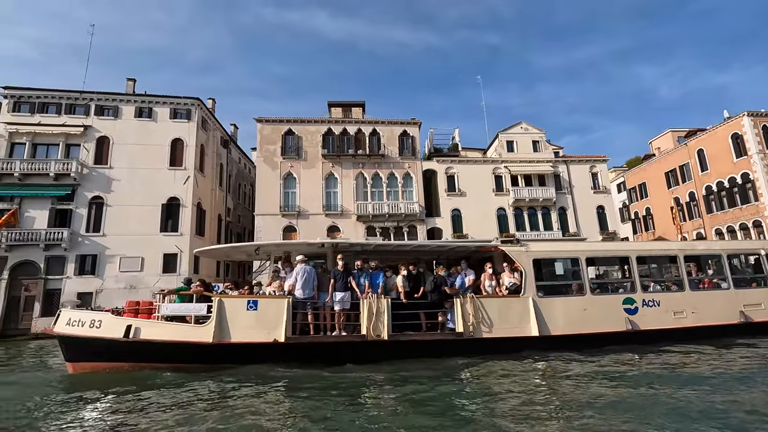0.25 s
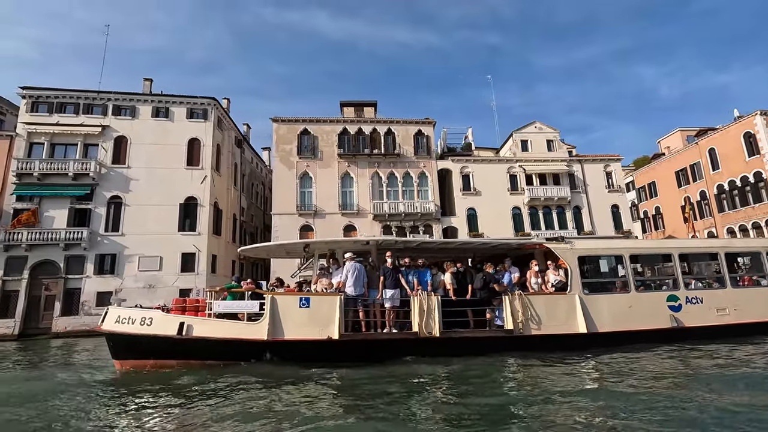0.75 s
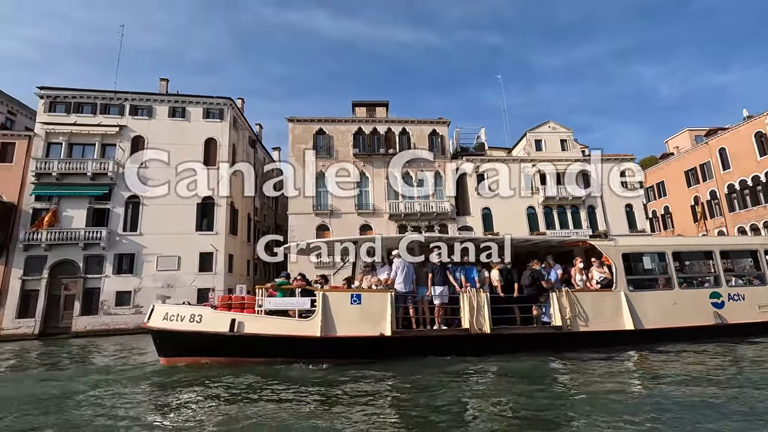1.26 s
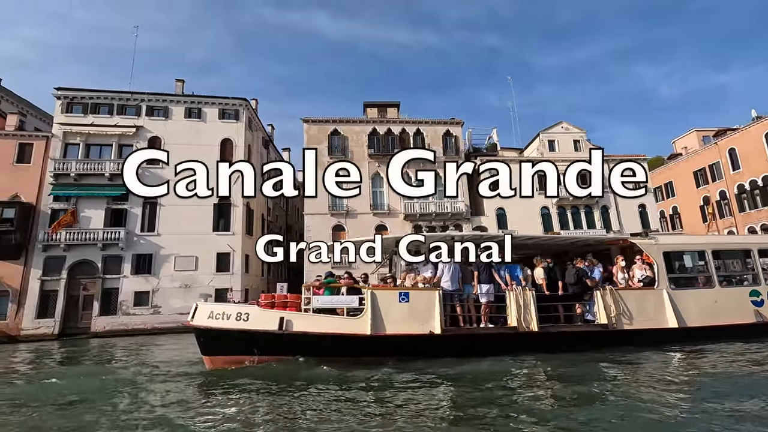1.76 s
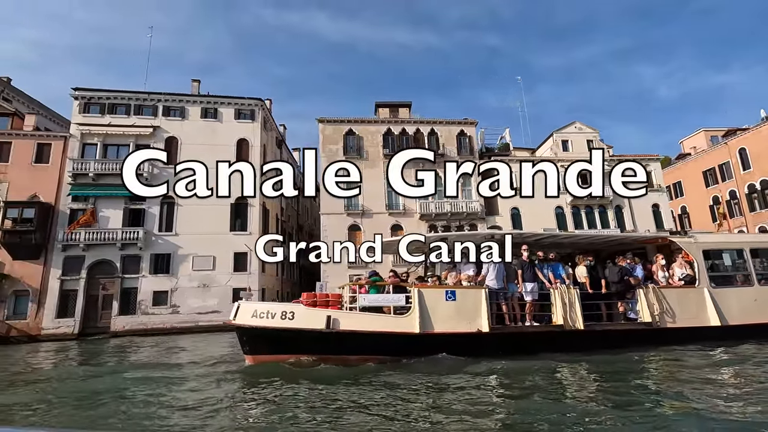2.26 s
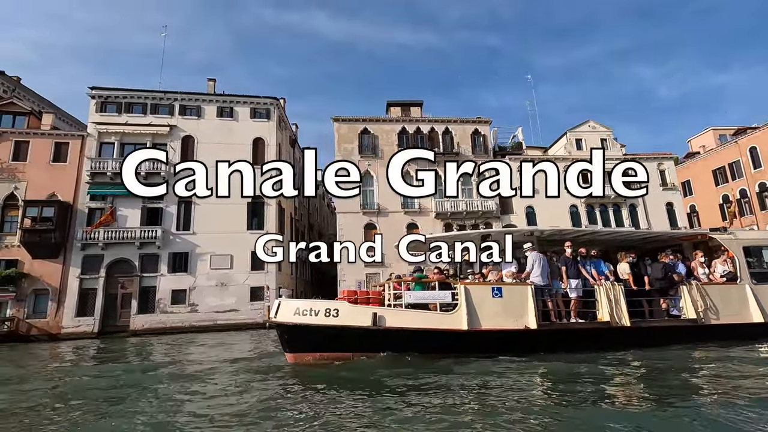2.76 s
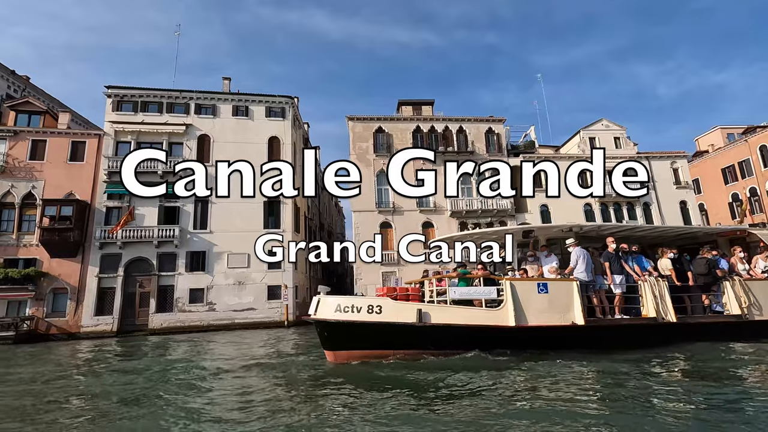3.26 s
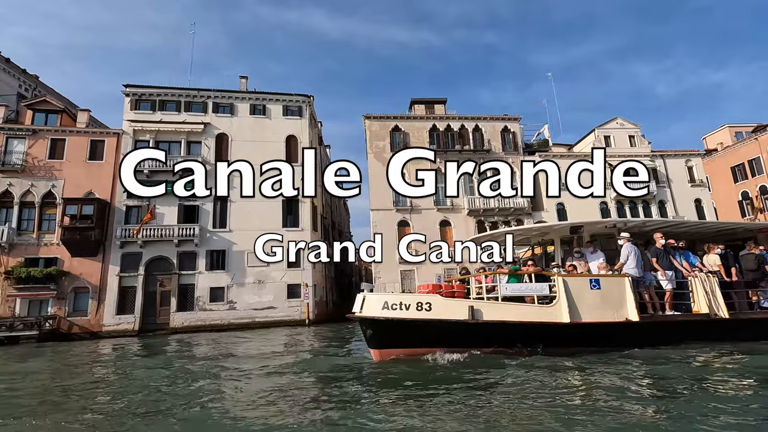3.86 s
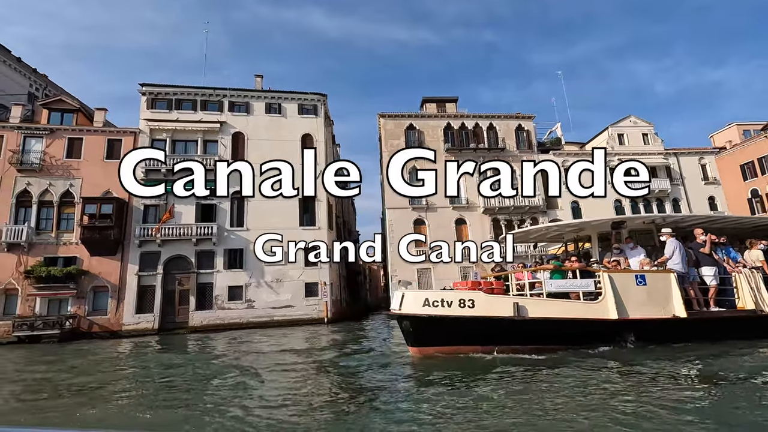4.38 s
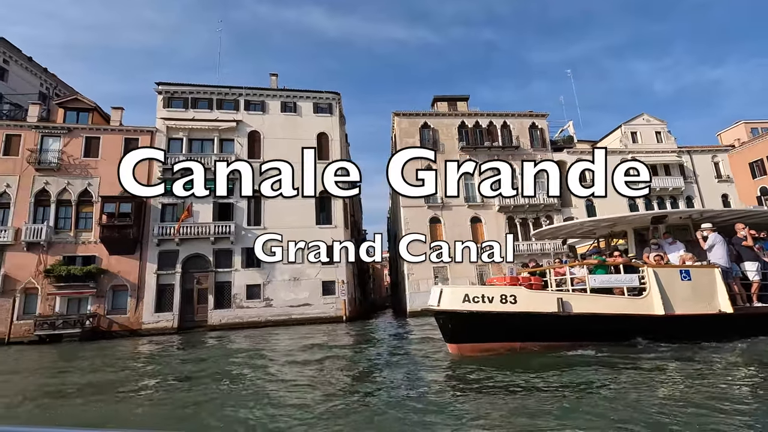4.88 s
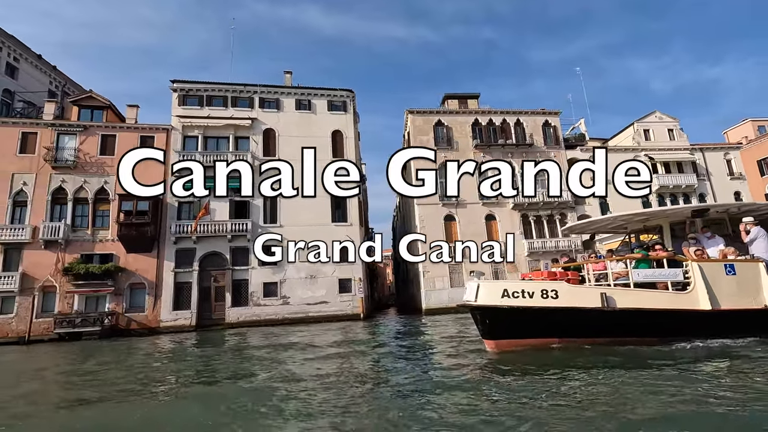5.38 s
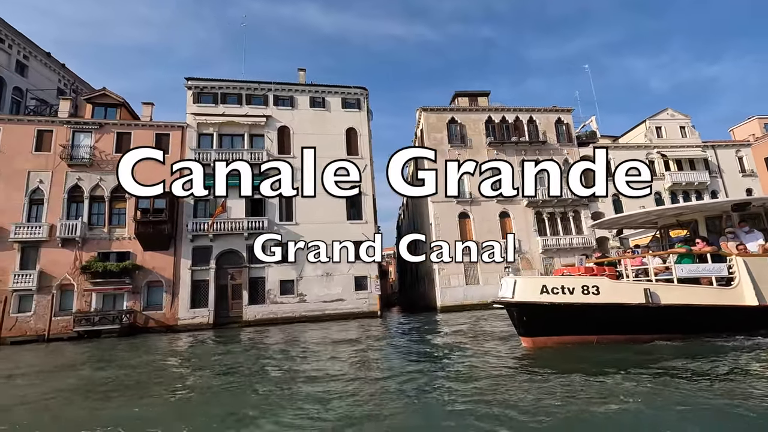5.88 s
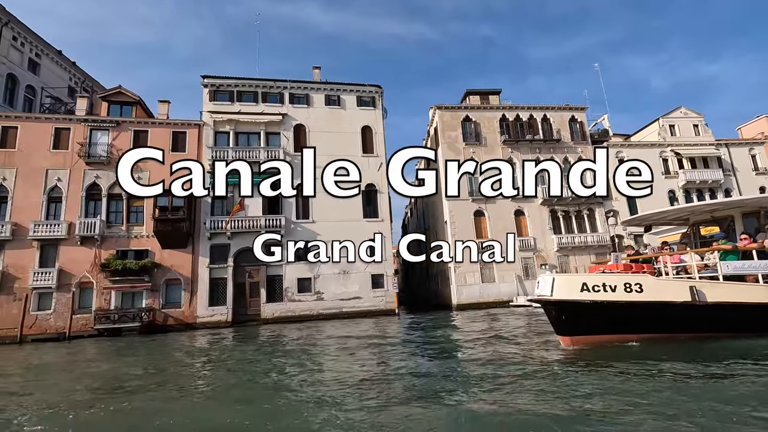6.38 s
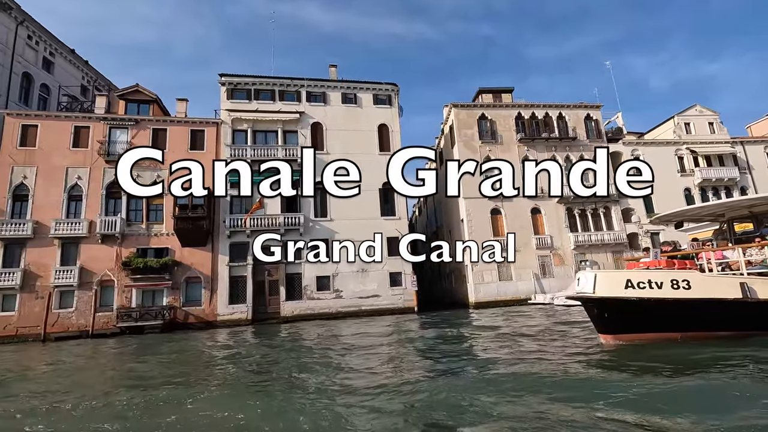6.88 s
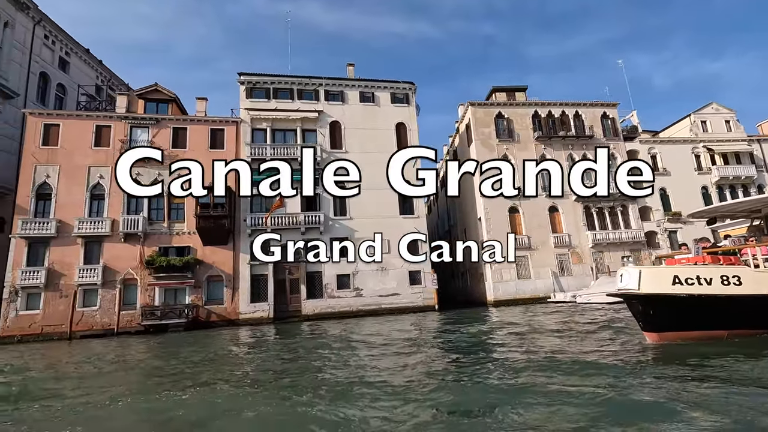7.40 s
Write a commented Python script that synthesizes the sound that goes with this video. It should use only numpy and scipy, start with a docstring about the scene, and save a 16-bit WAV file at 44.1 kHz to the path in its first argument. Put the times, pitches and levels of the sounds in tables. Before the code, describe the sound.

A small motorboat's low engine hum throbs steadily against a passing ferry's engine, while water rushes, gurgles and lightly slaps along the hull.

```python
"""The engine of a small motorboat hums along a canal, throbbing against that of a passing passenger ferry.
Wavering tones on the crankshaft rate make the hum, a singing cabin panel, a drive whine and the propeller's chug.
Shaped noise gives exhaust burble and rushing water; resonators fed with clicks make it gurgle and tinkle.
Short noise bursts slap the hull and drip, rising sines are single bubbles, and bow waves swell the hiss and foam."""
import sys
import numpy as np
from scipy import signal
from scipy.fft import rfft, irfft, next_fast_len
from scipy.io import wavfile

SR = 44100
rng = np.random.default_rng(int(sys.argv[2]) if len(sys.argv) > 2 else 0)


def unload_audio(sound):
    """Save the sound as a 16-bit wav file, at the path given as the first command line argument."""
    columns = np.transpose(np.atleast_2d(sound))
    # keep every value between -1 and 1, then stretch to whole-number steps
    steps = np.round(np.clip(columns, -1, 1) * 32767)
    wavfile.write(sys.argv[1], SR, steps.astype(np.int16))


N = 336924
TIME = np.arange(N) / SR  # seconds

# own engine's speed: (time [s], crankshaft rate [turns/s])
ENGINE_SPEED = [(0.0, 29.7), (0.95, 29.91), (1.2, 30.02), (1.5, 30.14), (1.9, 29.79), (2.33, 29.53),
                (2.68, 29.89), (3.05, 29.74), (3.45, 29.87), (3.8, 29.84), (4.4, 29.95), (4.95, 29.72),
                (5.6, 29.75), (6.05, 30.0), (6.45, 29.7), (6.9, 29.91), (7.3, 29.84), (7.64, 29.85)]
# own engine's hum: (multiple of crankshaft rate [ratio], level [dB], unsteadiness [share of level])
ENGINE_HUM = [(1, -40.3, .1), (1.5, -61, .3), (2, -36.2, .03), (2.5, -62, .3), (3, -51, .45),
              (3.5, -57, .4), (4, -52.5, .35), (5, -58.5, .4), (9, -62, .6), (11, -61, .5), (20, -66.5, .5)]
# cabin panel singing at ten times the crankshaft rate: (time [s], level before the throb [dB])
PANEL_LEVEL = [(0.0, -48), (0.15, -46.5), (0.48, -52), (0.63, -48), (0.86, -57), (1.0, -51), (1.28, -59),
               (1.55, -51), (1.8, -58), (1.93, -47.5), (2.4, -48), (2.72, -45.5), (3.03, -53.5),
               (3.55, -46.5), (4.0, -50.5), (4.72, -48), (4.81, -58), (4.92, -50), (5.2, -46.5),
               (5.35, -52), (6.05, -46.5), (6.3, -48.5), (6.6, -45.7), (7.64, -47)]
PANEL_THROB = .25  # share by which the panel trembles with the beat of the two engines
# drive whine: (time [s], level [dB])
WHINE_LEVEL = [(0.0, -61), (0.9, -62), (2.1, -53), (3.3, -59), (4.0, -56), (5.1, -53), (5.8, -54.5),
               (6.3, -80), (6.8, -58), (7.64, -51.5)]
WHINE_ORDER = 7.41  # multiple of the crankshaft rate
# own propeller's chug, swelling with its load: (time [s], level [dB])
PROPELLER_LEVEL = [(0, -41), (0.7, -56), (1.4, -44), (2.0, -45), (3.3, -54), (4.3, -39.5), (4.8, -50),
                   (5.3, -41.5), (5.75, -53), (6.3, -43), (7.64, -46)]
BLADE_ORDER, BLADE_OCTAVE_DB = 1.67, -52.5  # multiple of the crankshaft rate; level of the octave above
# the ferry's engine, throttled back as it draws level: (time [s], firing rate [Hz], level [dB])
FERRY_ENGINE = [(0.0, 64.22, -44), (0.2, 62.69, -42), (0.5, 63.63, -36), (0.9, 64.44, -37),
                (1.15, 62.8, -41), (1.45, 65.82, -40.5), (1.8, 65.39, -48), (2.2, 67.37, -45),
                (2.5, 65.79, -36.5), (2.9, 67.07, -37.5), (3.4, 66.37, -40.5), (3.9, 66.93, -40.5),
                (4.5, 66.94, -39.5), (4.95, 66.48, -43), (5.15, 64.4, -42), (5.35, 61.4, -41),
                (5.65, 61.15, -31), (6.0, 60.93, -36), (6.5, 60.13, -49), (6.85, 60.84, -40),
                (7.15, 60.83, -38.5), (7.64, 60.64, -45)]
# overtones of the ferry's exhaust: (multiple of firing rate [ratio], level [dB], unsteadiness [share of level])
FERRY_OVERTONES = [(1.5, -55, .6), (2, -59, .6), (2.5, -59, .6), (4, -63, .5)]
# exhaust burble: (time [s], level [dB])
BURBLE_LEVEL = [(0, -39.5), (2.9, -40.5), (3.8, -40), (6.3, -40.5), (6.85, -39), (7.64, -40.5)]

# water rushing along the hull, before the waves add to it: (time [s], level [dB])
RUSH_LEVEL = [(0, -48.5), (1.5, -48.5), (3.3, -48), (4.3, -48.5), (5.3, -48), (5.8, -48), (6.5, -50),
              (6.9, -48), (7.64, -49.6)]
# hull resonances that colour the wash: (pitch [Hz], relative level [dB], time to fall by 60 dB [s])
HULL_MODES = [(488, -0.5, 0.11), (586, -6.5, 0.027), (933, -0.5, 0.17), (1183, 3.5, 0.023),
              (1400, -1.5, 0.085), (1638, -6.5, 0.14)]
# waves breaking at the bow: (time [s], spray level [dB], foam level [dB], decay time constant [s])
BOW_WAVES = [(0.58, -59, -96, 0.17), (1.01, -59, -74, 0.24), (1.77, -58, -73, 1), (2.421, -61, -79, 0.91),
             (2.80, -66, -82, 0.99), (3.68, -61, -73, 0.24), (3.99, -57, -77, 0.14), (4.62, -65, -84, 1),
             (5.0, -64, -82, 0.5), (5.62, -62.5, -90, 0.47), (6.72, -61, -84, 0.51),
             (7.07, -61.5, -79, 0.37)]
WAVE_RISE_S, WAVE_CHURN_DB = 0.069, 3.5  # build-up of every wave; its churn in the wash, above its spray
SPRAY_DB, FOAM_DB, SPRAY_WAVER_DB = -60, -79, 0.6  # steady hiss and foam; how far all the hiss wavers
# wavelets slapping the hull: (time [s], peak level [dB], pitch of trapped air [Hz], pitch spread [octaves])
HULL_SLAPS = [(1.651, -42, 970, 0.3), (3.238, -37, 1110, 0.49), (3.32, -41, 1060, 0.35),
              (3.382, -41, 520, 0.83), (4.045, -47, 1290, 0.42), (5.24, -41, 1050, 0.5),
              (6.826, -37, 1020, 0.48), (6.868, -43, 1120, .3)]
# single bubbles that plink or glug: (time [s], peak level [dB], starting pitch [Hz])
SINGLE_BUBBLES = [(3.131, -47, 2980), (3.131, -47, 2480), (3.240, -40, 956), (3.241, -43, 1216),
                  (3.509, -40, 1055), (3.519, -46, 1210), (4.775, -45, 900), (5.14, -48, 975),
                  (5.745, -47, 416), (5.838, -43, 465), (5.85, -44, 317), (5.925, -50, 507),
                  (5.965, -46, 354), (6.738, -47, 955), (6.756, -49, 995), (6.78, -45, 425),
                  (7.004, -45, 408)]
BUBBLE_CYCLES, BUBBLE_RISE = 5.1, 0.0047  # cycles until loudest; rise in pitch per cycle, as a share
# drops landing: (time [s], peak level before panning [dB], pitch [Hz], pitch spread [octaves])
WATER_DROPS = [(1.37, -71.5, 9500, .4), (2.476, -61, 7500, .4), (2.657, -63, 9000, .4),
               (2.731, -58, 10000, .5), (2.881, -52, 7550, .4), (2.918, -59, 9500, .3),
               (3.745, -59, 9500, .5), (3.8, -61, 10500, 0.44), (3.826, -59, 10400, .5),
               (4.344, -63, 8000, .6), (4.833, -62, 7000, 0.37)]

# colour of the exhaust burble: (frequency [Hz], relative density [dB per Hz])
RUMBLE_SPECTRUM = [(14, -21), (24, -9.5), (37, -8.5), (50, -3.5), (62, -2.5), (77, -5.5), (96, -1),
                   (112, -6), (140, -12), (158, -12.5), (175, -15.5), (250, -16.5), (340, -17.5),
                   (500, -38.5), (900, -67)]
# colour of the water rushing along the hull: (frequency [Hz], relative density [dB per Hz])
WASH_SPECTRUM = [(150, -35), (300, -16.5), (420, 1.5), (520, 1), (680, -2), (850, -4), (940, -0.5),
                 (1130, -6), (1400, -5.5), (1600, -11.5), (2200, -17), (4000, -39)]
# colour of the bow wave's hiss: (frequency [Hz], relative density [dB per Hz])
SPRAY_SPECTRUM = [(700, -20), (1600, 0), (2200, 1.5), (3000, 1.5), (4000, -3.5), (5500, -7.5), (7600, -15),
                  (8600, -22.5), (11000, -23), (14000, -46)]
# colour of the fizzing foam: (frequency [Hz], relative density [dB per Hz])
FIZZ_SPECTRUM = [(3000, -32), (6000, 4.5), (8000, 3.5), (9000, 0), (10500, 0), (11500, -1), (13000, 1.5),
                 (14200, -17)]
# stereo width of the shaped noises: (frequency [Hz], left-right likeness [0 to 1])
STEREO_LIKENESS = [(60, 1), (170, 1), (350, 0.98), (520, 0.98), (720, 0.91), (1400, 0.91), (2000, 0.74),
                   (3000, 0.74), (5600, 0.78), (8600, 0.48), (10500, 1), (12700, .1)]
# sound reaches the right microphone first: (frequency [Hz], phase lead of the left one [radians])
LEFT_LEAD = [(150, -.005), (420, -0.12), (700, -0.36), (1250, -0.47), (2000, -0.72), (3000, -0.89),
             (5000, -0.73), (7000, -0.28)]
CUTOFF_HZ = 14200


def from_db(db):
    """Decibels to gain."""
    return 10 ** (np.asarray(db) / 20)


def rms_one(x):
    """Scale to an rms of 1."""
    return x / np.sqrt(np.mean(x ** 2) + 1e-20)


def in_time(rows):
    """Each column of a curve at every sample."""
    s, *columns = np.transpose(rows)
    return [np.interp(TIME, s, column) for column in columns]


def at_hz(points, hz):
    """Read a curve on a log-frequency axis."""
    f, value = np.transpose(points)
    return np.interp(np.log(hz + 1e-3), np.log(f), value)


def pan(left_db):
    """Left and right gains for a level difference; positive leans left."""
    return from_db(np.array([[.5], [-.5]]) * left_db)


def drift(rate_hz):
    """Smoothed noise that wanders slowly, faster for a higher rate; spread 1."""
    step = 40  # samples between the points of the slow curve
    count = N // step + 2
    pole = np.exp(-2 * np.pi * rate_hz * step / SR)
    noise = rng.standard_normal(count + 2000)
    slow = signal.lfilter([1], [1, -2 * pole, pole ** 2], noise)[2000:]  # skip the filter's start
    return np.interp(np.arange(N) / step, np.arange(len(slow)), rms_one(slow))


def tone(turns, unsteady):
    """A sine of rms 1 that wavers slowly in strength and phase."""
    waver = 1 + unsteady * (drift(1.94) + 1j * drift(2.6)) / np.sqrt(2)
    return rms_one(np.real(waver * np.exp(2j * np.pi * turns)))


def coloured(pair, spectrum, patchy_db):
    """Two unrelated signals become stereo with this spectrum, each octave flickering on its own; rms 1."""
    size = next_fast_len(N)
    hz = np.arange(size // 2 + 1) * SR / size
    in_band = (hz > spectrum[0][0] / 2) & (hz < spectrum[-1][0] * 2)
    mid, side = rfft(pair, size) * from_db(at_hz(spectrum, hz)) * in_band
    alike = np.clip(at_hz(STEREO_LIKENESS, hz), 0, 1)
    both = np.sqrt(1 + alike) * mid + np.sqrt(1 - alike) * side * [[1], [-1]]
    octave = np.log2(hz + 1)
    out = 0
    for k in range(4, 15):
        share = np.maximum(1 - abs(octave - k), 0)  # overlapping triangular bands
        band = irfft(both * share, size)[:, :N]
        out = out + band * from_db(patchy_db * drift(11.0))
    return rms_one(out)


def grains(per_s, spread_db):
    """Clicks of either sign and uneven size at random moments, in two unrelated channels."""
    excess = np.minimum(rng.exponential(1, (2, N)), 4)
    sizes = from_db(spread_db * excess) * rng.choice([-1, 1], (2, N))
    return sizes * (rng.random((2, N)) < per_s / SR)


def ring(clicks, hz, t60):
    """A resonator: a unit click sets a sine of about height 1 ringing, down 60 dB after t60 seconds."""
    r = from_db(-60 / (t60 * SR))
    w = 2 * np.pi * hz / SR
    return signal.lfilter([0, np.sin(w)], [1, -2 * r * np.cos(w), r * r], clicks + 1e-18)


def bursts(rows, rise_s, decay_s):
    """Each row is a brief burst of noise, band-passed around its pitch and scaled to its peak level."""
    out = np.zeros(2 * N)
    t = TIME[:SR // 8]
    shape = (1 - np.exp(-t / rise_s)) * np.exp(-t / decay_s)
    for s, peak_db, hz, octaves in rows:
        edges = np.minimum(hz * 2 ** (np.array([-.5, .5]) * octaves), SR / 2 - 1)
        band = signal.butter(2, edges, "band", fs=SR, output="sos")
        burst = shape * signal.sosfilt(band, rng.standard_normal(len(t)))
        at = round(s * SR)
        out[at:at + len(t)] += from_db(peak_db) * burst / abs(burst).max()
    return out[:N]


def engine_hum(turns):
    """The boat's engine fires twice a turn; whole and fractional orders of the crankshaft rate add up."""
    hum = 0
    for order, level_db, unsteady in ENGINE_HUM:
        # the hull delays the orders on both sides of the firing rate, which smears the strokes into a drone
        smear = (order - 2) ** 2 / 4
        hum = hum + from_db(level_db) * tone(order * turns - smear, unsteady)
    return hum


def cabin_panel(turns, ferry_firings):
    """A panel sings on the engine's tenth order and trembles at the beat rate of the two engines."""
    beat = np.cos(2 * np.pi * (ferry_firings - 2 * turns))
    level = from_db(in_time(PANEL_LEVEL)[0])
    return level * (1 + PANEL_THROB * beat) * tone(10 * turns, unsteady=.07)


def drive_whine(turns):
    """The drive whines at a fixed multiple of the crankshaft rate."""
    return from_db(in_time(WHINE_LEVEL)[0]) * tone(WHINE_ORDER * turns, unsteady=0.16)


def propeller(turns):
    """The blades beat against the hull, unevenly in the churned water, with an octave above."""
    blades = BLADE_ORDER * turns
    beat = from_db(in_time(PROPELLER_LEVEL)[0]) * tone(blades, unsteady=.35)
    return beat + from_db(BLADE_OCTAVE_DB) * tone(2 * blades, unsteady=.6)


def ferry(firings):
    """Its firing tone lies a few Hz off the boat's own, so the two throb; its exhaust adds faint overtones."""
    out = from_db(in_time(FERRY_ENGINE)[1]) * tone(firings, unsteady=.04)
    for multiple, level_db, unsteady in FERRY_OVERTONES:
        out = out + from_db(level_db) * tone(multiple * firings, unsteady)
    return out


def exhaust_burble():
    """Exhaust burbling through the water: low noise whose octaves flicker."""
    noise = rng.standard_normal((2, N))
    return from_db(in_time(BURBLE_LEVEL)[0]) * coloured(noise, RUMBLE_SPECTRUM, patchy_db=1.36)


def water_rush(turns):
    """Water along the hull: shaped noise that swells slightly once and twice a crankshaft turn."""
    swell = 1 + 0.037 * np.cos(2 * np.pi * turns) + 0.014 * np.cos(2 * np.pi * 2 * turns)
    return swell * coloured(rng.standard_normal((2, N)), WASH_SPECTRUM, patchy_db=1.0)


def hull_ringing():
    """Churned water and engine clatter, as noise, ring the hull's resonances towards the left."""
    modes = 0
    for hz, level_db, t60 in HULL_MODES:
        modes = modes + from_db(level_db) * rms_one(ring(rng.standard_normal(N), hz, t60))
    return modes * pan(3.9) / np.sqrt(len(HULL_MODES))


def gurgle():
    """Small bubbles: random clicks are dealt among resonators, the higher ones dying away sooner."""
    clicks = grains(per_s=80, spread_db=2.5)[0]
    dealt = rng.integers(0, 28, N)
    pitches = np.geomspace(400, 1500, 28)
    return rms_one(sum(ring(clicks * (dealt == k), hz, 45 / hz) for k, hz in enumerate(pitches)))


def wash(turns, gain):
    """Rushing water, the ringing hull and gurgling bubbles rise and fall together."""
    mix = from_db(-0.06) * water_rush(turns) + from_db(-9.5) * hull_ringing() + from_db(-10.5) * gurgle()
    return gain * mix * pan(0.46)


def bow_waves():
    """Each wave builds quickly and dies away; gives the power of all their spray and of their foam."""
    spray_power, foam_power = 0, 0
    for s, spray_db, foam_db, decay_s in BOW_WAVES:
        age = np.maximum(TIME - s, 0)
        build = np.minimum(age / WAVE_RISE_S, 1)
        shape = build * np.exp(-np.maximum(age - WAVE_RISE_S, 0) / decay_s)
        spray_power = spray_power + (from_db(spray_db) * shape) ** 2
        foam_power = foam_power + (from_db(foam_db) * shape) ** 2
    return spray_power, foam_power


def tinkle():
    """Countless bursting bubbles: clicks ring high resonators."""
    clicks = grains(per_s=450, spread_db=3.5)[0]
    dealt = rng.integers(0, 40, N)
    pitches = np.geomspace(1700, 7500, 40)
    # smaller bubbles ring higher and more faintly
    return rms_one(sum(ring(clicks * (dealt == k), hz, 70 / hz) / hz for k, hz in enumerate(pitches)))


def spray(gain):
    """The bow wave hisses as noise with dense clicks pattering in it, and tinkles."""
    patter = rng.standard_normal((2, N)) + 0.83 * rms_one(grains(per_s=2500, spread_db=0.0))
    hiss = coloured(patter, SPRAY_SPECTRUM, patchy_db=1.0)
    return gain * (hiss + from_db(-6.5) * tinkle()) * pan(-0.8)


def foam(gain):
    """Foam fizzes towards the left: a very dense shower of clicks, kept to the treble."""
    return gain * coloured(grains(per_s=7000, spread_db=3.0), FIZZ_SPECTRUM, patchy_db=-0.5) * pan(3.8)


def hull_slaps():
    """Wavelets trap air against the hull in short, pitched bursts of noise."""
    return bursts(HULL_SLAPS, rise_s=0.0054, decay_s=0.0083)


def single_bubbles():
    """Each bubble swells and dies within a few dozen cycles, rising in pitch as it nears the surface."""
    out = np.zeros(2 * N)
    t = TIME[:SR // 4]
    for s, peak_db, hz in SINGLE_BUBBLES:
        cycles = hz * t
        age = cycles / BUBBLE_CYCLES
        swell = (age * np.exp(1 - age)) ** 2
        rising = np.sin(2 * np.pi * cycles * (1 + BUBBLE_RISE * cycles / 2))
        at = round(s * SR)
        out[at:at + len(t)] += from_db(peak_db) * swell * rising
    return out[:N]


def water_drops():
    """Drops land as very short, high bursts of noise, a little to the left."""
    return bursts(WATER_DROPS, rise_s=0.002, decay_s=0.003) * pan(2.5)


def scene():
    """Engines below, water all round; breaking waves add to the steady rush, hiss and fizz."""
    turns = np.cumsum(in_time(ENGINE_SPEED)[0]) / SR
    firings = np.cumsum(in_time(FERRY_ENGINE)[0]) / SR
    own_boat = engine_hum(turns) + cabin_panel(turns, firings) + drive_whine(turns) + propeller(turns)
    engines = (own_boat + ferry(firings) + exhaust_burble()) * pan(0.029)

    spray_power, foam_power = bow_waves()
    # unrelated sounds add by power
    wash_gain = np.sqrt(from_db(in_time(RUSH_LEVEL)[0]) ** 2 + from_db(WAVE_CHURN_DB) ** 2 * spray_power)
    spray_gain = np.sqrt(from_db(SPRAY_DB) ** 2 + spray_power) * from_db(SPRAY_WAVER_DB * drift(2.9))
    foam_gain = np.sqrt(from_db(FOAM_DB) ** 2 + foam_power)
    water = wash(turns, wash_gain) + spray(spray_gain) + foam(foam_gain)
    return engines + water + hull_slaps() + single_bubbles() + water_drops()


def record(dry):
    """Two close microphones hear the sound slightly out of step; the ends fade and the top is cut steeply."""
    size = next_fast_len(N + SR // 10)
    hz = np.arange(size // 2 + 1) * SR / size
    lead = at_hz(LEFT_LEAD, hz) * np.array([[.5], [-.5]])
    fade = np.minimum(np.minimum(TIME, TIME[::-1]) / .004, 1)  # 4 ms in and out
    pair = irfft(rfft(dry * fade, size) * np.exp(1j * lead), size)[:, :N]
    low_pass = signal.ellip(10, .2, 80, CUTOFF_HZ, fs=SR, output="sos")
    return signal.sosfilt(low_pass, pair)


dry = scene()
out = record(dry)
unload_audio(out)
```